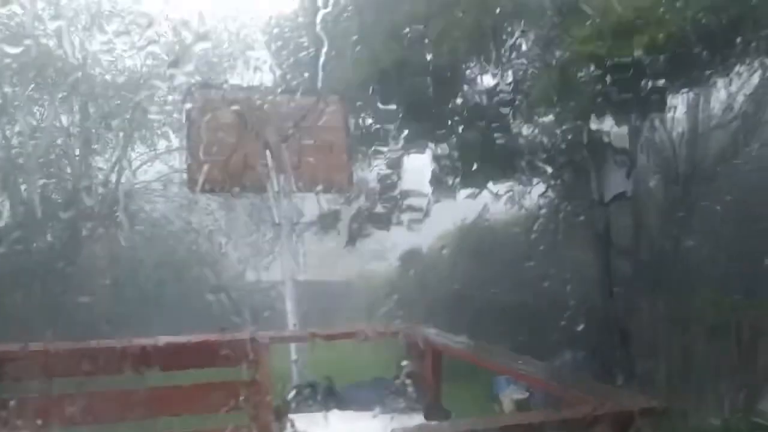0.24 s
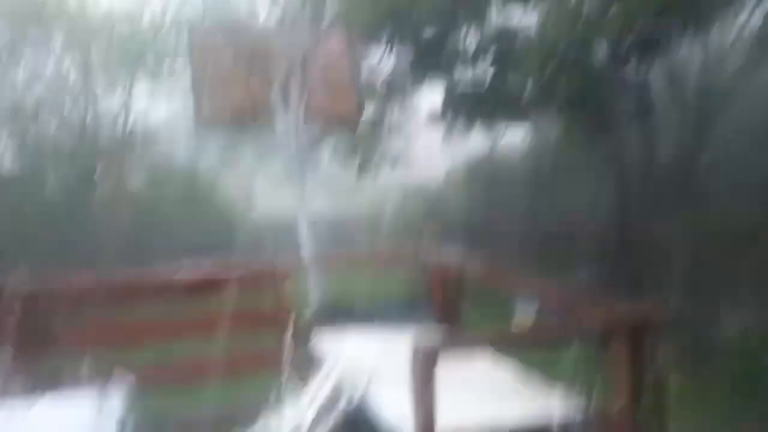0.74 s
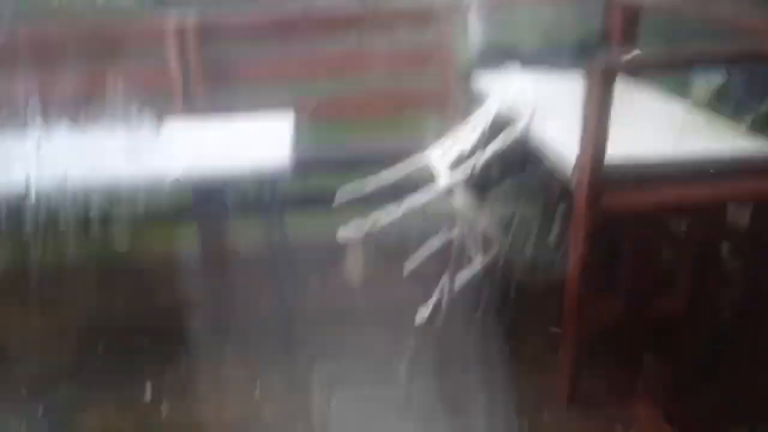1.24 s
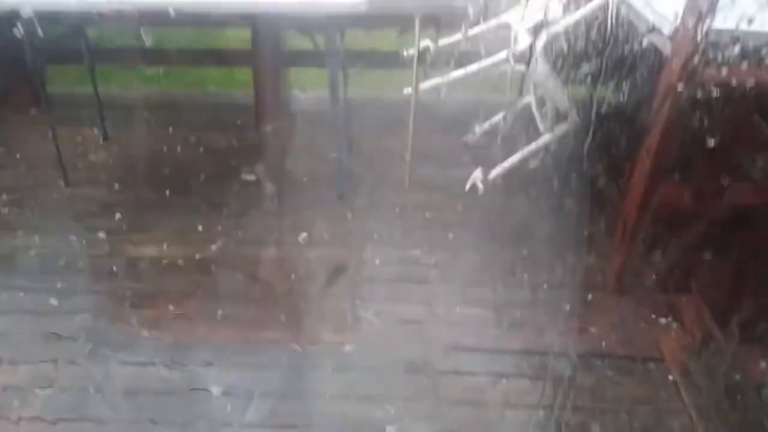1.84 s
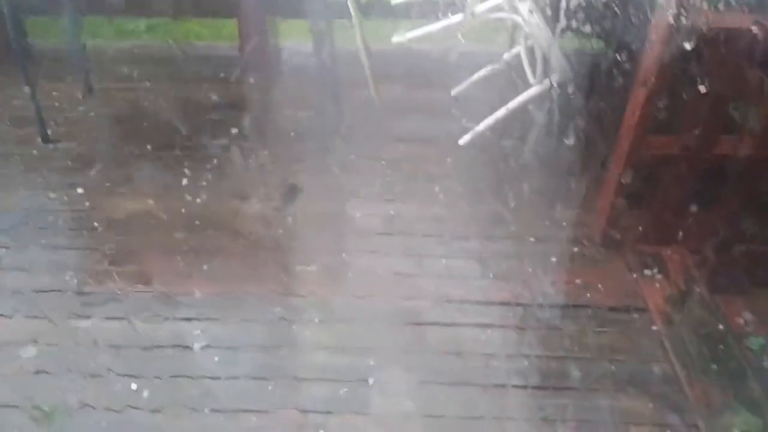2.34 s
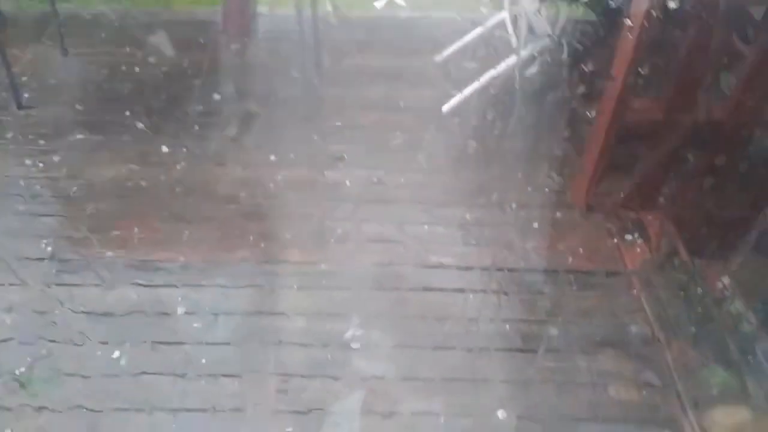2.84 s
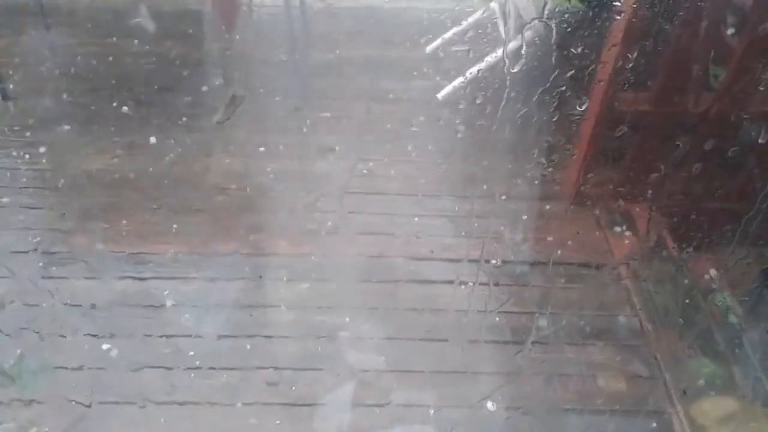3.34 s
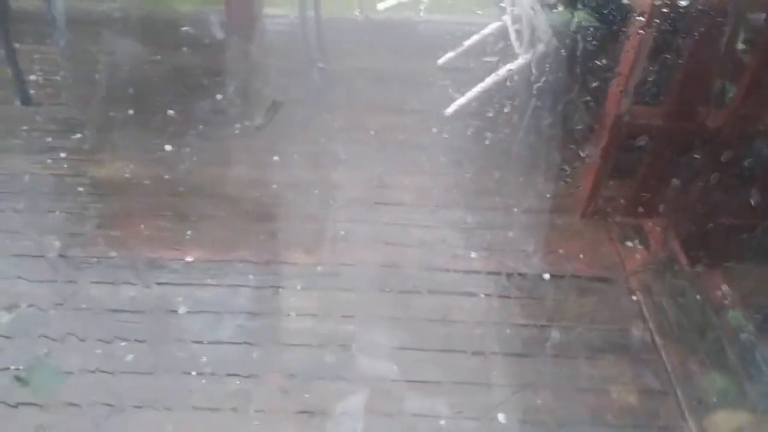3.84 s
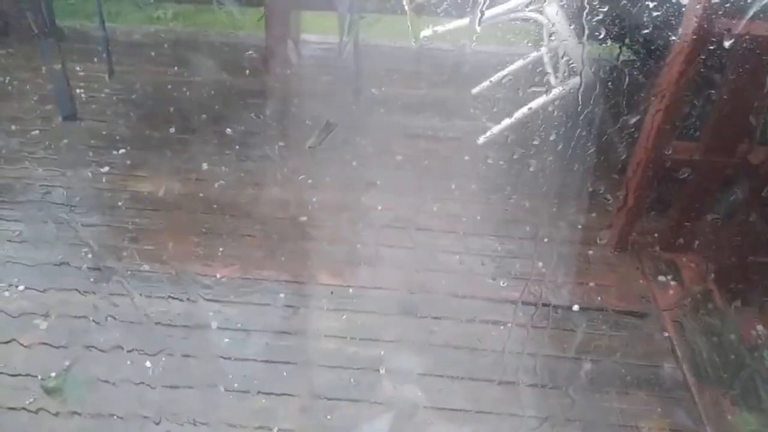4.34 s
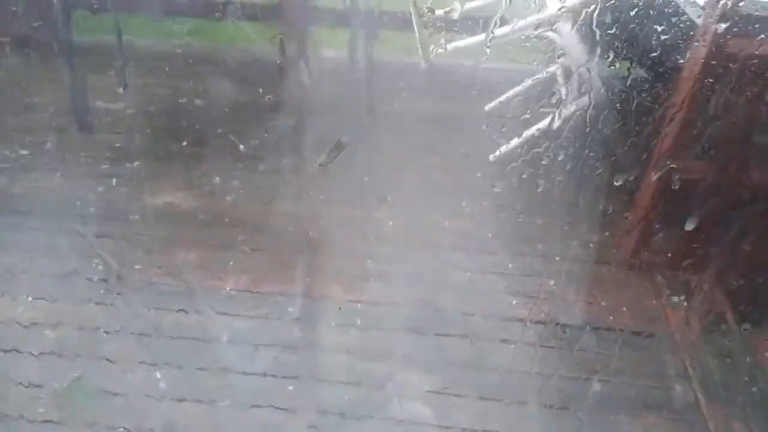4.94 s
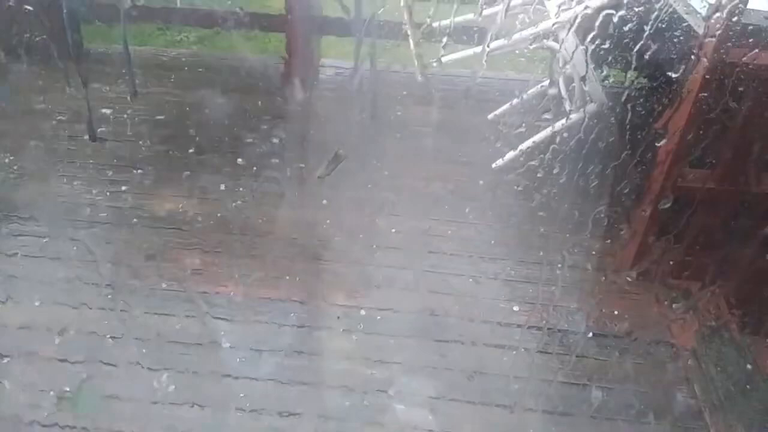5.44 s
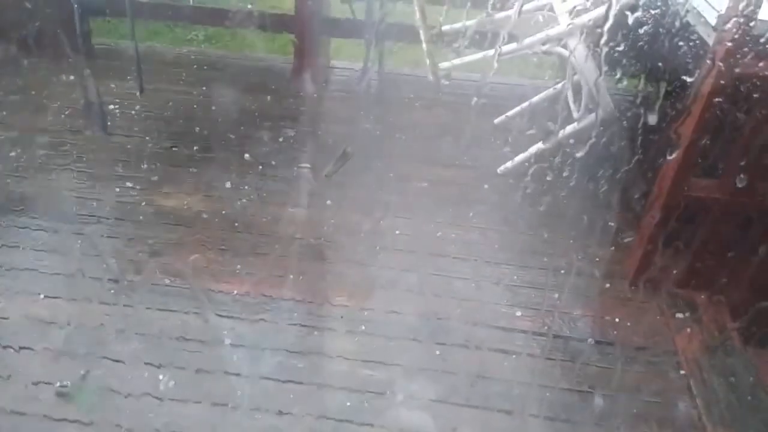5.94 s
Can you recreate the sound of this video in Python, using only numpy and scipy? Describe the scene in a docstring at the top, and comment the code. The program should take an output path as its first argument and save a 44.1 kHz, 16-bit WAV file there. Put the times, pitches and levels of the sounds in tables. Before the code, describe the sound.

Hail hits a window, heard from indoors through a small phone microphone with little bass. From the start a muffled downpour roars steadily, with small stones pattering on a wooden deck outside. Much louder, large stones knock and crack on the glass at an uneven pace, over a dozen a second, each with a short room echo; the harder ones ring briefly and trail a little hiss. The strongest land at about 0.25, 0.6, 1.7 and 2.1 seconds, the loudest slightly overloading the microphone. Around 2.4 seconds a thin bar outside gives two faint, high clinks. The hits thin briefly after 3.1 seconds, then cluster again from 3.6 to 3.9. From 4 seconds they weaken, with sharper ones near 4.4 and 4.8. Toward 6 seconds only a few soft ticks remain, and the roar becomes slightly quieter, duller and hollow.

```python
"""Hail beats on a window pane, heard from the room behind it with a small phone microphone.
From the start a downpour roars and small stones patter on the deck. Large stones ring the glass and echo
round the room; a noise suppressor lets hiss through after each, and the loudest overload the microphone.
Near 1 s the phone tips down, and near 2.4 s a thin bar clinks twice. From 4 s the knocks weaken, and in
the lulls the suppressor dulls the roar and cuts holes in it."""
import sys
import numpy as np
from scipy import signal
from scipy.fft import rfft, irfft, next_fast_len
from scipy.io import wavfile
from scipy.ndimage import uniform_filter1d

SR = 44100
rng = np.random.default_rng(int(sys.argv[2]) if len(sys.argv) > 2 else 0)


def dump_mix(stems):
    """Bounce the given channels to the path in sys.argv[1] as a 16-bit WAV at rate SR."""
    frames = np.atleast_2d(stems).T  # one column per channel
    limited = np.clip(frames, -1, 1)  # hard clip at full scale
    pcm = np.round(limited * 32767).astype(np.int16)
    wavfile.write(sys.argv[1], SR, pcm)


N = 273410


def amp(db):
    """Amplitude ratio of a level in decibels."""
    return 10 ** (np.asarray(db) / 20)


def unit_rms(x):
    """Normalisation to unit power."""
    return x / np.sqrt(np.mean(x ** 2) + 1e-20)


def curve_at(points, hz):
    """Interpolation of a (frequency, value) table on a logarithmic frequency axis."""
    f, value = np.transpose(points)
    return np.interp(np.log(hz + 1), np.log(f + 1), value)


def add(mix, start_s, sound):
    """Superposition of a sound on the mix."""
    part = mix[max(round(start_s * SR), 0):][:len(sound)]
    part += sound[:len(part)]


def resonance(hz, centre_hz, q):
    """Response of a damped oscillator with quality factor q and peak gain 1."""
    return 1 / (1 + 1j * q * (hz / centre_hz - centre_hz / (hz + 1)))


def filtered(x, response_db):
    """Convolution with a response given at 513 even steps up to half the sample rate."""
    return signal.oaconvolve(x, np.roll(irfft(amp(response_db)), 512) * np.hanning(1024), "same")


def overlap_add(spectra):
    """Overlap-add synthesis of sound from short-time spectra."""
    return signal.istft(spectra, nperseg=512, noverlap=384)[1][:N]


def drifting_noise(colour, patchy_db, flicker_db):
    """Randomly modulated noise: short-time spectra, their frequencies [Hz] and their times [s]."""
    frames, hz = N // 128 + 5, np.fft.rfftfreq(512, 1 / SR)
    real, imag, patches = rng.standard_normal((frames, 257, 3)).T
    patches = unit_rms(uniform_filter1d(uniform_filter1d(patches, size=9, axis=0), size=14, axis=1))
    flicker = unit_rms(uniform_filter1d(rng.standard_normal(frames), size=3))
    level_db = curve_at(colour, hz)[:, None] + patchy_db * patches + flicker_db * flicker
    spectra = (real + 1j * imag) * amp(level_db)
    return spectra / np.std(overlap_add(spectra)), hz, np.arange(frames) * 128 / SR


# Downpour through the glass: (frequency [Hz], spectral level [dB])
ROAR_SPECTRUM = [(100, -99), (294, -9), (500, -9), (698, -5), (903, -0.5), (1820, 0.5), (2200, 1),
                 (3200, -9), (5090, -27.5), (6500, -44.5), (8000, -47), (16000, -95.5)]
# The roar as heard: (time [s], level [dB], noise suppressor's tilt from 2.5 to 8 kHz [dB/octave])
ROAR_COURSE = [(0.0, -37, 6), (0.92, -37, 5.5), (1.52, -38, 7.5), (2.12, -36.5, 14), (2.99, -36.5, 13.5),
               (3.14, -37.5, 5.5), (3.63, -37, 10), (3.99, -39.5, 4.5), (4.83, -38.5, 12),
               (5.2, -40.5, -5.5), (5.46, -40, 11.5), (5.85, -41, -20), (5.98, -45.5, -29), (6.08, -41, -1),
               (6.2, -42.5, -35)]
# Holes the suppressor cuts in the roar: (time [s], gain [dB])
SUPPRESSOR_HOLE_GAIN = [(0, 1), (3.9, -5), (4.2, 3.5), (4.35, -8), (4.6, -5.5), (4.8, 1), (5.2, -4),
                        (5.5, 1), (5.8, -10), (5.98, -27), (6.2, -12)]
# Bands of those holes: (frequency [Hz], width [Hz], share of the gain in dB [ratio])
SUPPRESSOR_HOLES = [(675, 270, 0.56), (1342, 196, 0.67)]

def downpour():
    """Incoherent summation: far stones merge into a roar; the suppressor dulls and notches it in lulls."""
    spectra, hz, t = drifting_noise(ROAR_SPECTRUM, patchy_db=2.5, flicker_db=0.58)
    times, level_db, slope = np.transpose(ROAR_COURSE)
    tilt_db = np.outer(np.log2(np.clip(hz, 2500, 8000) / 2500), np.interp(t, times, slope))
    holes = sum(share * np.exp(-((hz - f) / (width / 2)) ** 4) for f, width, share in SUPPRESSOR_HOLES)
    holes_db = np.outer(holes, np.interp(t, *np.transpose(SUPPRESSOR_HOLE_GAIN)))
    return overlap_add(spectra * amp(tilt_db + holes_db + np.interp(t, times, level_db)))


# Top of the background roar: (frequency [Hz], spectral level [dB])
FIZZ_SPECTRUM = [(3000, -20), (4300, 0.5), (6200, -2), (7200, -24.5)]

def roar_fizz():
    """Band-limited noise: a faint fizz at 4-6.5 kHz tops the roar, thinning as the holes deepen."""
    spectra, _, t = drifting_noise(FIZZ_SPECTRUM, patchy_db=3.5, flicker_db=0.0)
    level_db = -65.5 + 0.5 * np.interp(t, *np.transpose(SUPPRESSOR_HOLE_GAIN))
    return overlap_add(spectra * amp(level_db))


def small_stones(rate_per_s=50, above_roar_db=3):
    """Poisson impacts: stones patter on the deck, following the roar's level, low-passed by the glass."""
    times, level_db, _ = np.transpose(ROAR_COURSE)
    strength = amp(np.interp(np.arange(N) / SR, times, level_db) + above_roar_db)
    scatter_db = 1.4 * np.minimum(rng.exponential(1, N), 3)
    blows = strength * amp(scatter_db) * (rng.random(N) < rate_per_s / SR)
    spot, patter = rng.integers(0, 8, N), np.zeros(N)
    for k, hz in enumerate(np.geomspace(1700, 3200, num=8)):
        tap = knock(0, hz, hardness_db=-29, echo_db=-16, thud_db=-20)
        patter += signal.oaconvolve(blows * (spot == k), tap)[:N]
    return signal.sosfilt(signal.butter(6, 3300, fs=SR, output="sos"), patter)


# Broad crack of a stone: (frequency [Hz], level [dB])
CRACK_SPECTRUM = [(120, -57.5), (300, -17.5), (900, -6), (2500, 7.5), (4000, 2), (5500, -5.5), (6500, -17),
                  (8000, -21.5), (11000, -58), (16000, -79.5)]
# Reverberation of the room: (frequency [Hz], T60 [s])
ROOM_DECAY = [(300, 0.22), (900, 0.28), (2500, 0.26), (6000, 0.4), (12000, 0.23)]
LEAD = 64  # samples of fade-in before contact

def knock(peak_db, knock_hz, hardness_db, echo_db, thud_db, size=12288):
    """Impact excitation: a cluster of taps drives the pane's resonances; the room echoes on."""
    t, hz = np.arange(size) / SR, np.fft.rfftfreq(size, 1 / SR)
    strike_db, strike_s, rattle_t60_s = 3, 0.0045, 0.053
    taps = rng.standard_normal(size) * (rng.random(size) < 0.3)
    rattle_db = strike_db * np.exp(-t / strike_s) - 60 * t / rattle_t60_s
    rattle = 1.1 * taps * amp(rattle_db) * np.minimum(t / 0.00072, 1)
    rattle[8] += 1.8  # the first contact is a clean tap
    bands, frame_s, noise = signal.stft(rng.standard_normal(size), SR, nperseg=256)
    room_decay = amp(-60 * frame_s / curve_at(ROOM_DECAY, bands)[:, None])
    echo = signal.istft(noise * room_decay, SR, nperseg=256)[1][:size]
    echo *= amp(echo_db) * np.minimum(t / 0.0072, 1)  # reflections build up
    ring = amp(2) * resonance(hz, knock_hz, q=10.6) * resonance(hz, knock_hz, q=0.63)
    ring /= (1 + 1j * hz / 7000) ** 4
    overtone = resonance(hz, 1.36 * knock_hz, q=3.26) * resonance(hz, 2.6 * knock_hz, q=0.057)
    spot = resonance(hz, knock_hz, q=2.06) ** 2 + overtone  # colour of the struck spot
    edge_hz = 7500 * 2 ** (hardness_db / 31.5)  # softer stones sound duller
    spot /= (1 + 1j * hz / edge_hz) ** 4  # thick glass passes little treble
    thud = amp(thud_db) * resonance(hz, 720, q=0.96) ** 2
    crack = amp(hardness_db - 1 + curve_at(CRACK_SPECTRUM, hz))
    colour = spot + thud + crack
    rattle, echo = rfft(np.pad([rattle, echo], [(0, 0), (LEAD, 0)])[:, :size])
    sound = irfft(rattle * (colour + ring) + echo * colour)
    sound *= np.minimum(np.arange(size) / LEAD, 1) ** 2
    return amp(peak_db) * sound / abs(sound).max()


# Stones on the pane, and at pitches below 1 kHz dull knocks on its wooden frame: (time [s], peak level [dB],
# pitch [Hz], hardness [dB], echo gain [dB])
IMPACTS = [(0.068, -34, 3600, -15.5, -27), (0.146, -31.5, 420, -17, -3), (0.149, -22.5, 1920, -19, -14),
           (0.248, -6.5, 2900, 7.5, -13), (0.365, -16, 2880, -1, -9.5), (0.408, -15.5, 1980, -21, -7.5),
           (0.572, -3.5, 3100, 3, -6), (0.604, -2, 2970, -0.5, -5), (0.643, -14, 4530, 12.5, 0),
           (0.77, -22, 2920, -13, -36), (0.781, -28.5, 870, -33, -5), (0.828, -20.5, 1650, -34, -0.5),
           (1.009, -31, 4500, -14, -22), (1.027, -26.5, 3540, 6, -16), (1.077, -17.5, 2320, 4, -12),
           (1.101, -16.5, 1750, -2, -13), (1.184, -23.5, 1760, -32, 0.5), (1.213, -9, 2580, 8.5, -10),
           (1.256, -9.5, 2720, 7.5, -17.5), (1.433, -20, 1000, -4.5, -8.5), (1.448, -6.5, 2550, 1.5, -19),
           (1.603, -22, 2160, -7.5, 2), (1.634, -18, 2200, 11, -4), (1.652, -24.5, 1660, -8, -11),
           (1.684, -18.5, 2450, 8, -18), (1.715, -7, 2140, -1, -5.5), (1.799, -16, 3000, 12.5, -10.5),
           (1.813, -33.5, 4500, 21, -30), (1.926, -8, 2950, 9, -14), (1.954, -19, 2660, 9.5, -4.5),
           (2.006, -15.5, 1700, -5, -37), (2.0206, -6, 3200, 8, -11), (2.114, -3.5, 2870, -3.5, -12.5),
           (2.152, -30, 695, -25, -6.5), (2.156, -13, 2420, 4, -9.5), (2.199, -9.5, 1290, -7, -12),
           (2.219, -8, 3050, 4.5, -11.5), (2.355, -32, 895, 19, 15), (2.373, -28.5, 390, -32, 7),
           (2.374, -10.5, 2770, 4, -5.5), (2.41, -11, 2460, 3, -32), (2.522, -21, 3120, 12, -44),
           (2.564, -17.5, 2640, -2, -11), (2.58, -20, 1890, -29, 6), (2.608, -14, 3280, 3.5, -14),
           (2.652, -15.5, 1650, 11, -4), (2.727, -11.5, 3170, 3.5, -9.5), (2.832, -23.5, 4500, 19, -27),
           (2.8885, -14.5, 1940, -6, -25), (2.992, -25, 1920, 15, -15), (3.015, -12.5, 2800, 5.5, -14),
           (3.085, -9, 2100, 3, -11.5), (3.367, -25.5, 2560, 11, -15), (3.536, -24.5, 2670, -3, -27),
           (3.543, -24.5, 2800, -5, -32), (3.603, -19, 1300, -15.5, -6), (3.607, -33, 331, -17, -1.5),
           (3.619, -16, 2300, 4, -21), (3.651, -13, 3380, -1, -12.5), (3.708, -22, 3240, 17, -8.5),
           (3.777, -9.5, 1850, 13.5, -28.5), (3.808, -15.5, 2700, -14, -10.5),
           (3.842, -17.5, 3000, 13.5, -6.5), (3.847, -31.5, 573, -26, -16.5), (3.899, -11, 2880, 3, -15.5),
           (4.093, -20, 2780, 5.5, -17), (4.147, -21, 2430, 12, -8.5), (4.258, -26.5, 1930, -36, -2),
           (4.277, -21.5, 956, -28, -7.5), (4.318, -23, 2590, 1.5, -9), (4.353, -28, 2510, 17, -19),
           (4.376, -13, 2740, 8.5, -11), (4.473, -20.5, 2440, 8, -8.5), (4.605, -24, 1610, 13, -22),
           (4.636, -25.5, 2570, 6, -32), (4.682, -19, 3120, 8, -33), (4.729, -27.5, 1510, -11, -4),
           (4.764, -19, 2320, 14.5, -36), (4.809, -22.5, 1690, 9, -22), (4.834, -12, 2280, 4.5, -15),
           (4.893, -28.5, 2040, 12, -1), (4.907, -25.5, 2020, 10.5, -10), (5.046, -22.5, 1760, 4.5, -17),
           (5.058, -21, 2210, -6, -21), (5.266, -28.5, 2700, -39, -4), (5.313, -19.5, 3040, 5, -9),
           (5.373, -24, 2560, 6.5, -17), (5.481, -24, 3140, 8, -7.5), (5.535, -20.5, 2150, 3.5, -21),
           (5.572, -27, 1770, -9.5, -6.5), (5.681, -30, 2020, -14, -3), (5.772, -34.5, 3510, -26, 0),
           (6.03, -32.5, 3180, -31, 1.5)]

def large_stones():
    """Superposed transients: one knock per stone, with less low thud in the strong, high ones."""
    mix = np.zeros(N)
    for start_s, peak_db, hz, hardness_db, echo_db in IMPACTS:
        thud_db = -26 - 1.12 * (peak_db + 13.5) - 0.65 * np.log2(hz / 2500)
        add(mix, start_s - LEAD / SR, knock(peak_db, hz, hardness_db, echo_db, thud_db))
    return mix


# Steady treble behind the noise suppressor: (frequency [Hz], spectral level [dB])
HISS_SPECTRUM = [(3000, -20.5), (5000, 7), (8000, 0), (10500, -6.5), (12500, -14), (14500, -22),
                 (16000, -50)]

def gated_hiss(reference_db=-50.5, closing_s=0.32):
    """Gating: the suppressor lets high hiss through after each knock, then shuts it off, top first."""
    t = np.arange(SR // 2) / SR
    gate = amp(-60 * (t / closing_s) ** 1.215) * np.minimum(t / 0.0024, 1)
    power = np.zeros(N)
    for start_s, peak_db, _, hardness_db, _ in IMPACTS:
        level_db = reference_db + 0.87 * (peak_db + 15.5) + 0.81 * hardness_db
        add(power, start_s, (amp(level_db) * gate) ** 2)
    spectra, hz, frame_s = drifting_noise(HISS_SPECTRUM, patchy_db=1.0, flicker_db=2.2)
    power_db = 10 * np.log10(np.interp(frame_s, np.arange(N) / SR, power) + 1e-12)
    octaves_up = np.log2(np.maximum(hz, 6000) / 6000)
    dulling_db = -0.34 * np.outer(octaves_up, np.maximum(reference_db - power_db, 0))
    return np.sqrt(power) * overlap_add(spectra * amp(dulling_db))


# Clear notes of the glass: (time [s], frequency [Hz], level [dB], T60 [s])
PANE_MODES = [(0.2489, 2624, -9, 0.046), (0.2482, 3000, -8.5, .04), (0.571, 3020, -11, 0.051),
              (0.573, 5130, -17.5, .02), (0.607, 3000, -17, 0.06), (0.605, 5374, -19, 0.033),
              (1.715, 2194, -5, 0.031), (3.086, 2016, -5.5, 0.014), (3.087, 4600, -24, 0.033),
              (2.025, 3600, -13, 0.039), (3.778, 1800, -8.5, 0.029), (3.778, 6300, -23, 0.045),
              (3.807, 3540, -21, 0.038), (5.062, 1760, -21, 0.034), (1.184, 1900, -23, .06),
              (1.927, 2520, -18, .03), (2.41, 2470, -18, 0.03), (3.653, 2960, -23, 0.043),
              (3.901, 2760, -25, 0.037), (3.899, 5730, -20, .02), (4.376, 2540, -18.5, 0.055),
              (4.835, 2085, -14.5, 0.033), (2.889, 1900, -17.5, 0.028)]

def pane_ringing(rise_s=0.00079):
    """Free vibration: after some knocks, single modes of the pane ring out as damped sinusoids."""
    mix, t = np.zeros(N), np.arange(4096) / SR
    for start_s, hz, db, t60 in PANE_MODES:
        envelope = amp(db - 60 * t / t60) * np.minimum(t / rise_s, 1)
        add(mix, start_s, envelope * np.sin(2 * np.pi * hz * t))
    return mix


# Thumps of the microphone capsule: (time [s], peak level [dB])
CAPSULE_PUSHES = [(0.25, -47), (0.574, -41), (0.607, -39), (1.716, -39), (2.116, -50), (3.087, -42)]

def capsule_thumps(push_s=0.0021):
    """Pressure pulses: each of the hardest knocks gives the capsule one short, soft push."""
    mix = np.zeros(N)
    pulse = np.sin(np.pi * np.arange(0, 1, 1 / (push_s * SR))) ** 2
    for start_s, db in CAPSULE_PUSHES:
        add(mix, start_s, amp(db) * pulse)
    return mix


# Modes of a thin bar outside: (frequency [Hz], level [dB], width [Hz])
BAR_MODES = [(5280, -35.5, 100), (7930, -44, 180), (11250, -50, 160), (14480, -68, 160)]
BAR_HITS, BAR_T60_S = [(2.371, -0.5), (2.411, -3)], 0.22  # hits: (time [s], gain [dB])

def bar_clinks(size=16384):
    """Modal resonance: a stone clinks on a thin bar, whose high modes shimmer on in the room."""
    mix, t, hz = np.zeros(N), np.arange(size) / SR, np.fft.rfftfreq(size, 1 / SR)
    for start_s, hit_db in BAR_HITS:
        shake = rfft(rng.standard_normal(size))
        modes = sum(amp(db) * unit_rms(irfft(shake * resonance(hz, f, q=f / width) ** 2))
                    for f, db, width in BAR_MODES)
        add(mix, start_s, modes * amp(hit_db - 60 * t / BAR_T60_S) * np.minimum(t / 0.003, 1))
    return mix


def scene():
    """Linear superposition of the hail and the downpour in one channel."""
    impacts = large_stones() + small_stones() + pane_ringing() + bar_clinks()
    return (impacts + downpour() + gated_hiss() + roar_fizz())[None]


def suppress_noise(x):
    """Downward expansion: bands whose smoothed power sinks near their quiet level are lowered."""
    hz, _, spectra = signal.stft(x, SR, nperseg=512, noverlap=384)
    power = uniform_filter1d(abs(spectra) ** 2, size=3, axis=0)
    smoothed = signal.lfilter([0.08], [1, -0.92], power, axis=1, zi=power[:, 4:5])[0]
    power_db = 10 * np.log10(smoothed + 1e-16)
    quiet_db = np.percentile(power_db, 12, axis=1, keepdims=True)
    # (frequency [Hz], cut at the quiet level [dB])
    depths = [(560, 4.0), (720, 12.5), (860, 2.0), (1100, 1.6), (1280, 7.0), (1480, 3.6),
              (2400, 2.7), (4000, 4.1), (9000, 0.92)]
    cut_db = curve_at(depths, hz)[:, None] * np.clip(1 - (power_db - quiet_db) / 6.1, 0, 2.5)
    return overlap_add(spectra * amp(-cut_db))


# Microphone response while the phone is raised: (frequency [Hz], gain [dB])
RAISED_RESPONSE = [(2000, -1), (3200, 1), (4500, 4), (5800, 2.5), (7500, 0.5), (12000, -9)]
# Notches of the microphone port: (frequency [Hz], width [Hz], gain [dB])
MIC_NOTCHES = [(7100, 1000, -9.5), (7130, 100, -13), (9490, 130, -11.5)]
TURN_START_S, TURN_END_S = 0.74, 1.45
LIMITER_KNEE, CLIP_LEVEL, SELF_NOISE_DB, BAND_LIMIT_HZ = 0.58, 0.55, -87, 15900

def record(dry):
    """Directivity and overload: the tipping phone colours the sound, then limits and clips its peaks."""
    hz = np.fft.rfftfreq(1024, 1 / SR)
    port_db = sum(db / (1 + ((hz - f) / (width / 2)) ** 2) for f, width, db in MIC_NOTCHES)
    tipped = np.interp(np.arange(N) / SR, (TURN_START_S, TURN_END_S), (0, 1))
    faced = tipped * dry[0] + (1 - tipped) * filtered(dry[0], curve_at(RAISED_RESPONSE, hz))
    heard = suppress_noise(filtered(faced, port_db))
    capsule_bass_cut = signal.butter(2, 170, "high", fs=SR, output="sos")
    heard = signal.sosfilt(capsule_bass_cut, heard)
    envelope = uniform_filter1d(abs(signal.hilbert(heard, next_fast_len(N)))[:N], size=15)
    limited = heard / (1 + (envelope / LIMITER_KNEE) ** 8) ** (1 / 8) + capsule_thumps()
    limited += 0.012 * uniform_filter1d(limited ** 2, size=150)  # a lopsided capsule rumbles faintly
    clipped = np.clip(limited, -CLIP_LEVEL, CLIP_LEVEL) + amp(SELF_NOISE_DB) * rng.standard_normal(N)
    input_bass_cut = signal.butter(1, 45, "high", fs=SR, output="sos")
    band_limit = signal.firwin(511, BAND_LIMIT_HZ, window=("kaiser", 9), fs=SR)
    return signal.oaconvolve(signal.sosfilt(input_bass_cut, clipped), band_limit, "same")[None]


dry = scene()
out = record(dry)
dump_mix(out)
```